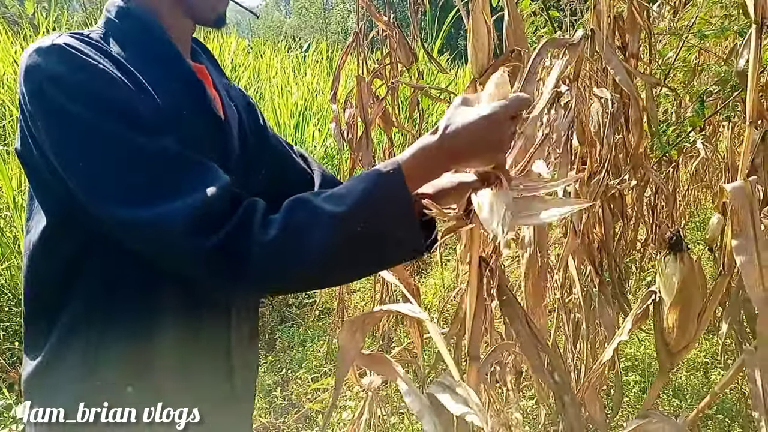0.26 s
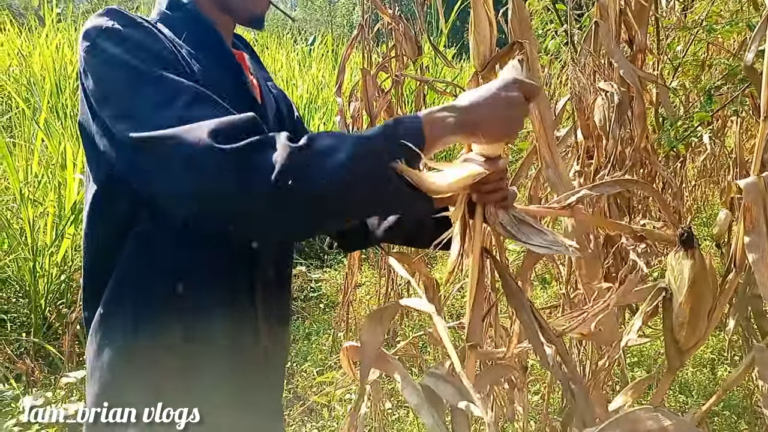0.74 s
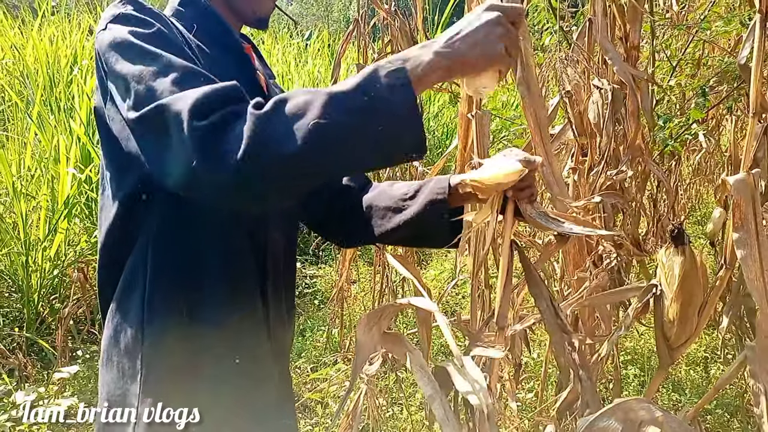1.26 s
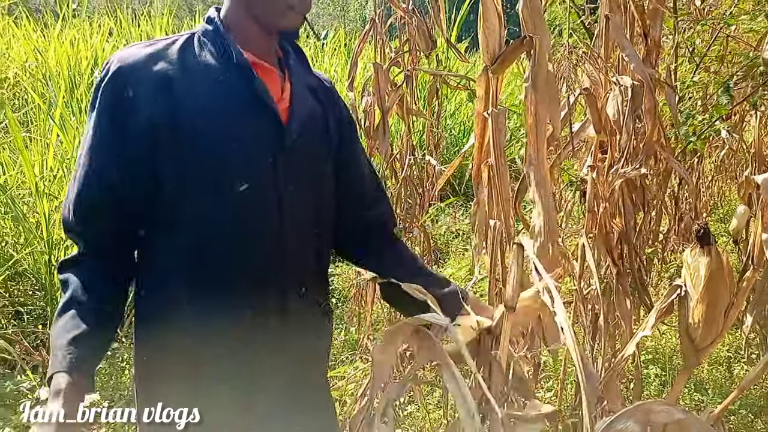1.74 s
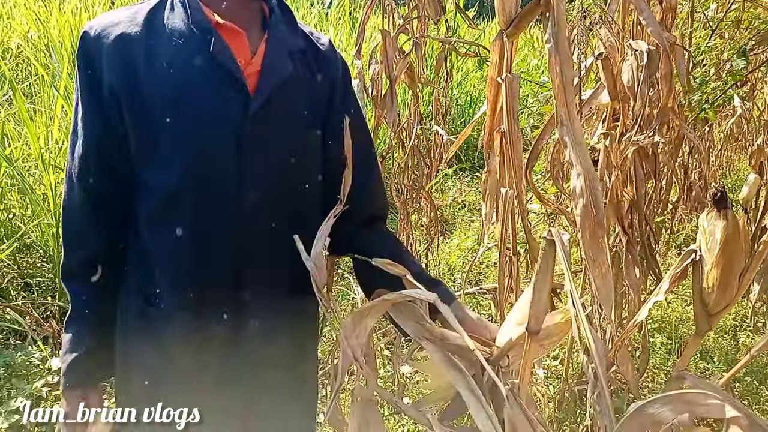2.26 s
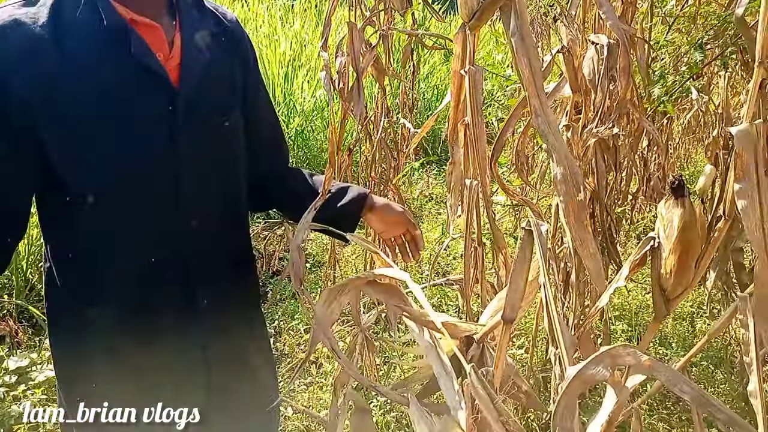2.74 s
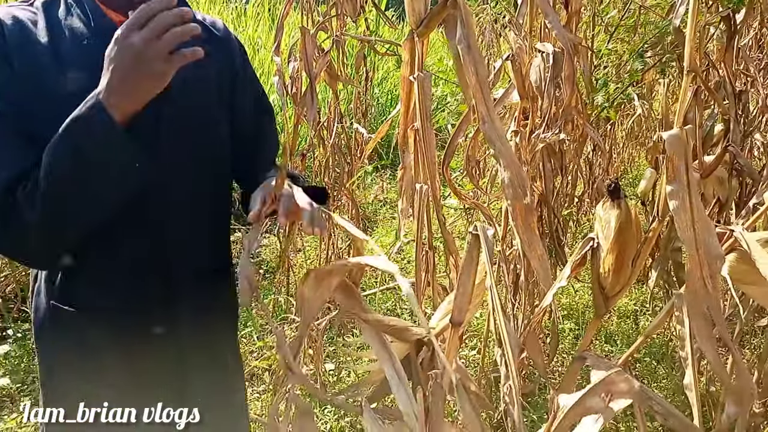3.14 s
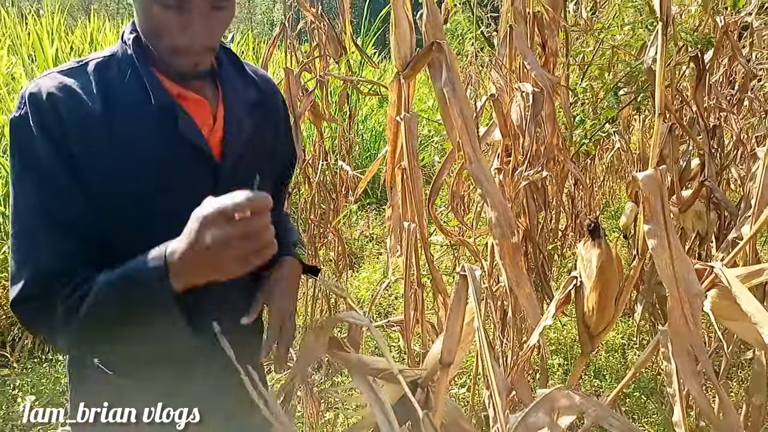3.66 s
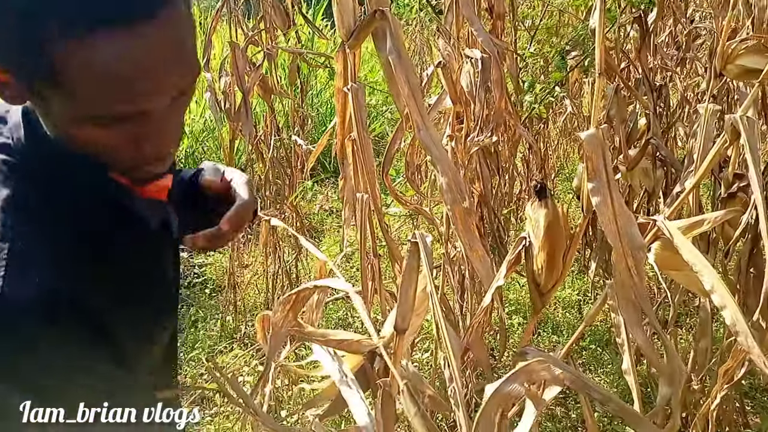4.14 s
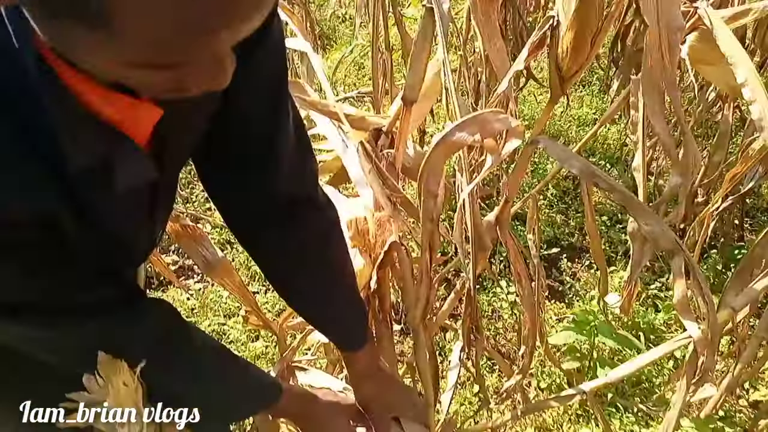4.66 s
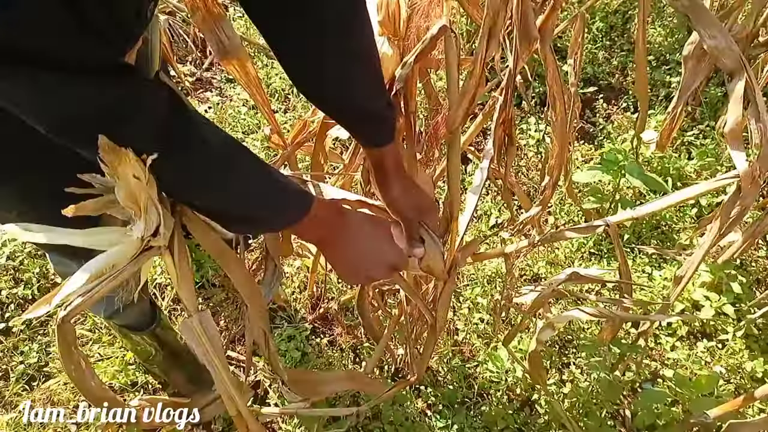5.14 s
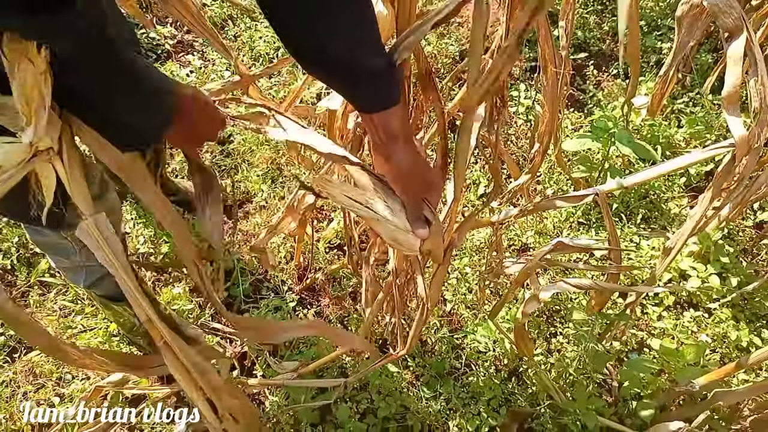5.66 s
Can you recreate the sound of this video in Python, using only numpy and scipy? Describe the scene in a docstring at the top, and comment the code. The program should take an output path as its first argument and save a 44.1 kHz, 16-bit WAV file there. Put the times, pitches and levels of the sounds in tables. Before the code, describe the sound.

Dry corn husks crinkle and tear close by, with sharp stalk snaps, small cloth bumps and a final burst of hard ripping.

```python
"""Dry maize husks crinkle in thousands of tiny cracks as an ear is husked and snapped off by hand.
Then another is stripped. Ribs and stalks snap more sharply: one crack, then a dying run of splinters.
A small microphone on the coat picks up bumps and scuffs of leaves and cloth, made of damped rings.
Deeper knocks come through the coat; short rubs, squeaks and faint low tones are narrow gliding noise.
The field is quiet: behind it all lies only a faint, steady noise of air."""
import sys
import numpy as np
from scipy import signal
from scipy.fft import rfft, irfft
from scipy.io import wavfile
from scipy.ndimage import uniform_filter1d

SR = 44100
rng = np.random.default_rng(int(sys.argv[2]) if len(sys.argv) > 2 else 0)


def output_pcm(signal):
    """Save a mono or channel-first signal as 16-bit PCM at the path in sys.argv[1].

    Samples are clipped to [-1, 1] before scaling.
    """
    pcm = np.clip(np.atleast_2d(signal).T, -1, 1) * 32767
    wavfile.write(sys.argv[1], SR, np.round(pcm).astype(np.int16))


N = 260190
TIME = np.arange(N) / SR  # s
EDGE_HZ = 15650  # top of the recorder's band

# colour of husks torn hard, as a relative spectrum: f/Hz, level per Hz/dB
TEAR_COLOUR = [(100, -28.5), (400, -31.5), (700, -11.5), (1200, -9), (1800, -4), (2200, 1.5), (2800, 5.5),
               (3900, 0), (5200, -1.5), (6600, 6), (8500, -3.5), (11000, -10), (13400, -17), (15200, 2)]


def amp(db):
    """Turns decibels into gain."""
    return 10 ** (np.asarray(db) / 20)


def unit(x):
    """Scales a sound to rms 1."""
    return x / np.sqrt(np.mean(x ** 2) + 1e-20)


def read(points, hz):
    """Reads a spectrum table along a log-frequency axis."""
    f, db = np.transpose(points)
    return np.interp(np.log(hz + 1), np.log(f), db)


def hump(hz, centre_hz, octaves):
    """A bell around one frequency, 1 at its top."""
    distance = np.log2((hz + 1) / centre_hz) / octaves
    return np.exp(-.5 * distance ** 2)


def add(mix, s, sound):
    """Mixes a sound in at a time in seconds."""
    part = mix[max(round(s * SR), 0):][:len(sound)]
    part += sound[:len(part)]


def causal(db):
    """The sharp-fronted impulse response that has this spectrum."""
    log_gain = np.log(amp(np.r_[db, db[-2:0:-1]]))
    # minimum phase puts the energy as early as it can be
    spectrum = np.exp(np.conj(signal.hilbert(log_gain)))
    return irfft(spectrum[:len(db)])


def stroke(t, start, length, rise_s, dying_s):
    """Gain of one movement: a quick rise, a hold, then it dies away."""
    rise = np.clip((t - start) / rise_s, 0, 1)
    return rise * np.exp(-np.maximum(t - start - length, 0) / dying_s)


def knock_ring(modes, pitch_hz, octaves, rise_s):
    """Damped modes after a soft contact that favours one pitch, scaled to peak 1."""
    t = np.arange(6000) / SR
    ring = np.zeros(len(t))
    for hz, db, t60 in modes:
        fading = amp(db - 60 * t / t60)
        ring += fading * hump(hz, pitch_hz, octaves) * np.sin(2 * np.pi * hz * t)
    ring *= (1 - np.exp(-t / rise_s)) ** 2  # the cloth gives way, so the ring swells in
    return ring / abs(ring).max()


def air(level_db=-76):
    """A faint, even outdoor background: noise shaped to the colour of still air."""
    # still air over the field, as a relative spectrum: f/Hz, level per Hz/dB
    air_colour = [(25, -46), (70, 3.5), (130, -6), (250, -1), (500, -3.5), (900, -11), (3000, -27.5),
                  (15000, -53)]
    gain = amp(read(air_colour, np.fft.rfftfreq(N, 1 / SR)))
    noise = irfft(rfft(rng.standard_normal(N)) * gain, N)
    return amp(level_db) * unit(noise)


def knocks():
    """Heavier, deeper blows that reach the microphone through the coat as damped rings."""
    # knocks as the ear breaks free and the picker bends down: t/s, peak/dB, pitch the blow favours/Hz
    blows = [(1.676, -36, 514), (4.601, -31.5, 324), (4.736, -29.5, 420), (4.753, -41, 90),
             (4.868, -40.5, 99)]
    # what they ring with: f/Hz, relative level/dB, time to fade by 60 dB/s
    thud_modes = [(75, -15, 0.25), (123, 9, 0.036), (170, -2.5, 0.072), (316.5, 5, 0.045),
                  (538, -6.5, 0.065), (712, 17, 0.015)]
    out = np.zeros(N)
    for s, db, pitch_hz in blows:
        ring = knock_ring(thud_modes, pitch_hz, octaves=1.36, rise_s=0.0022)
        add(out, s, amp(db) * ring)
    return out


def rubs():
    """Short resonant rubs, squeaks and faint soft low tones: noise in one narrow, gliding resonance."""
    # t/s, length/s, start f/Hz, end f/Hz, width of each of two equal resonators in a row/Hz, level/dB
    rubs_and_tones = [(0.313, 0.16, 260, 218, 61, -70.5), (0.819, .13, 1700, 1550, 20, -66.5),
                      (1.025, .09, 620, 560, 110, -68), (1.092, .11, 215, 220, 18, -70),
                      (1.288, 0.12, 95, 75, 49, -72.5), (1.387, 0.092, 560, 520, 330, -65),
                      (1.439, .16, 401, 380, 10, -67.5), (1.799, 0.22, 386, 410, 82, -67.5),
                      (1.936, .037, 1543, 1404, 180, -48), (3.765, .085, 1371, 1178, 360, -52)]
    out = np.zeros(N)
    for s, length, start_hz, end_hz, width_hz, db in rubs_and_tones:
        r = np.exp(-np.pi * width_hz / SR)
        noise = rng.standard_normal(SR) + 1j * rng.standard_normal(SR)
        wander = signal.lfilter([1], [1, -2 * r, r * r], noise)  # slow noise around 0 Hz
        hz = np.linspace(start_hz, end_hz, int(length * SR))
        glide = np.exp(2j * np.pi * np.cumsum(hz) / SR)
        tone = (wander[-len(hz):] * glide).real  # moves the noise up to the gliding pitch
        add(out, s, amp(db) * unit(tone * signal.windows.tukey(len(hz), .7)))
    return out


def brushing(scuff_db=-2, lowest_hz=125):
    """Single bumps, and scuffs made of many tiny slips, set the microphone and its mount ringing."""
    # cloth sliding over it: start t/s, length/s, level before scuff_db/dB, dying time/s, favoured pitch/Hz
    scuff_rows = [(2.127, 0.062, -33.5, 0.038, 434), (3.255, 0.028, -40.5, .035, 410),
                  (3.333, 0.15, -43, 0.057, 460), (4.75, 0.044, -58, .04, 520),
                  (5.239, 0.079, -51.5, 0.017, 486), (5.517, 0.1, -50.5, 0.042, 505)]
    # leaves and cloth bumping it: t/s, peak before the bass cut/dB, favoured pitch/Hz
    bump_rows = [(2.131, -26.5, 343), (2.141, -32.5, 1020), (2.172, -24.5, 215), (2.213, -28, 261),
                 (2.357, -42, 210), (3.264, -33.5, 513), (3.367, -36, 350), (3.4, -38.5, 1200),
                 (3.442, -32.5, 199), (3.458, -32.5, 200), (3.501, -37.5, 215), (3.548, -36.5, 170)]
    # what the microphone and mount ring with: f/Hz, relative level/dB, time to fade by 60 dB/s
    mount_modes = [(173, -2.5, 0.082), (204.7, 4.5, 0.067), (290, -9, 0.085), (362.5, -4.5, 0.047),
                   (529, 6.5, 0.016), (726, -9, 0.031), (1230, 11.5, 0.01)]
    slips = rng.standard_normal(N) * (rng.random(N) < 600 / SR)  # about 600 per second
    out = np.zeros(N)
    for start, length, db, dying_s, pitch_hz in scuff_rows:
        ring = knock_ring(mount_modes, pitch_hz, octaves=0.66, rise_s=0.002)
        scuff = unit(signal.oaconvolve(slips, ring)[:N])
        out += scuff * amp(db + scuff_db) * stroke(TIME, start, length, 0.015, dying_s)
    for s, db, pitch_hz in bump_rows:
        add(out, s, amp(db) * knock_ring(mount_modes, pitch_hz, octaves=0.51, rise_s=0.0026))
    # so light a contact moves no deep bass
    bass_cut = signal.butter(2, lowest_hz, "highpass", fs=SR, output="sos")
    return signal.sosfilt(bass_cut, out)


def handwork(t, stir_bright_db=4.5, stir_hollow_db=9.5):
    """Adds the power of pulls and stirring leaves; the strongest sets the colour.

    Returns level (dB), brightness (dB per octave) and hollow body (dB)."""
    # dry leaves stirring around the picker all the time: t/s, level/dB
    stirring = [(0, -51), (.25, -50.5), (.45, -47), (0.8, -49.5), (1.15, -51.5), (1.5, -50.5), (2.3, -51.5),
                (2.9, -51.5), (3.08, -55), (3.3, -49), (4.25, -49.5), (5.0, -48.5), (5.9, -49.5)]
    # grips and pulls on the husk: start t/s, length/s, level/dB, dying time/s,
    # brightness per octave/dB, hollow body/dB
    grips = [(0, 0.017, -39.5, 0.024, -1.5, -10), (0.322, 0.03, -51, 0.03, -15, -9),
             (0.406, 0.091, -48, 0.046, -2, 1), (0.553, 0.12, -45.5, 0.13, -3.5, -7),
             (1.03, 0.028, -40, 0.034, -3, -10), (1.575, 0.089, -38.5, 0.017, -3.5, -16),
             (1.681, 0.45, -36.5, 0.036, -4, -12.5), (1.738, 0.036, -34.5, 0.025, -2.5, -24),
             (1.829, 0.053, -35, 0.013, -5, -17), (2.134, 0.11, -45, .008, 2.5, 19),
             (3.146, 0.029, -47.5, 0.18, 3.5, 0), (3.355, 0.1, -45.5, 0.023, -5.5, -2),
             (3.529, 0.28, -49, 0.03, -5, -9.5), (4.335, 0.051, -45.5, 0.087, -3, -0.5),
             (4.476, 0.072, -51.5, 0.042, -4.5, -17), (4.533, .14, -47, 0.12, -3, 9),
             (4.749, 0.13, -38.5, 0.0084, -4.5, -5.5), (5.055, .04, -47.5, 0.032, 0.5, -2),
             (5.277, 0.048, -40, .008, 0, 7.5), (5.411, 0.03, -37, 0.021, -3, -11),
             (5.472, 0.022, -41, 0.03, -4.5, -31), (5.516, 0.087, -27, 0.066, -0.4, 1)]
    power = [amp(np.interp(t, *np.transpose(stirring))) ** 2]
    colours = [(stir_bright_db, stir_hollow_db)]
    for start, length, db, dying_s, bright_db, hollow_db in grips:
        # the fingers take 13 ms to load the husk
        pull = amp(db) * stroke(t, start, length, 0.013, dying_s)
        power.append(pull ** 2)
        colours.append((bright_db, hollow_db))
    total = np.sum(power, axis=0)
    bright_db, hollow_db = np.transpose(colours) @ np.array(power) / total  # average weighted by power
    return 10 * np.log10(total), bright_db, hollow_db


def small_snaps(count=70, level_db=-7, spread_db=5, low_hz=2800, high_hz=7900, lasts_s=0.0022):
    """Small ribs give way at random moments, louder when the hands work harder; rows as in snaps()."""
    when, size, ring = rng.random((count, 3)).T
    s = when * N / SR
    work_db = handwork(s)[0]
    db = work_db + level_db + spread_db * (2 * size - 1)
    ring_hz = low_hz * (high_hz / low_hz) ** ring
    return [(*row, lasts_s, 0) for row in zip(s, db, ring_hz)]


def snaps(focus_db=15, splinters_per_s=6000, shiver_s=0.025, level_db=1, ring_db=-12, ring_s=0.0017):
    """A first crack and a dying run of splinters ring the broken piece; the leaf around it shivers."""
    # breaking ribs and stalks: t/s, level of the loudest 4 ms before level_db/dB, ring of the piece/Hz,
    # dying time of the splintering/s, sharp edge/dB
    breaks = [(0.101, -45, 4830, 0.0067, 5), (0.238, -33.5, 4600, 0.0029, 12.5),
              (0.499, -37.5, 2800, 0.013, -12), (0.791, -41.5, 5830, 0.009, 5),
              (1.0376, -39, 2800, 0.0077, 20), (1.28, -47, 6300, 0.0047, 13),
              (1.6234, -24.5, 2080, 0.00088, 15.5), (1.632, -25, 2000, 0.01, 5),
              (1.676, -23.5, 1830, 0.0041, 13), (1.679, -22, 5500, 0.0066, 13),
              (1.785, -33, 5050, .0035, 0), (1.882, -35.5, 3000, .008, 2), (2.094, -33, 5660, 0.015, 16),
              (2.934, -40.5, 6800, .0082, 3), (2.995, -26.5, 6900, 0.0056, 13.5),
              (3.397, -28.5, 7100, 0.011, 21), (3.546, -46.5, 3840, 0.0084, 0),
              (3.616, -40, 3500, 0.003, 0), (3.774, -38, 1570, 0.0058, -4), (3.82, -50, 1160, .0018, 0),
              (4.389, -51, 2350, .013, 2), (4.565, -35, 6060, 0.013, -13),
              (4.781, -31.5, 7000, 0.0021, -19), (4.799, -26.5, 2850, 0.0038, -22),
              (4.868, -34.5, 4600, 0.011, -2), (4.937, -49, 6600, 0.0015, -5),
              (4.964, -36.5, 6300, 0.0015, -7), (5.047, -45, 7060, 0.0014, -6),
              (5.146, -46.5, 7200, .002, 3), (5.183, -45.5, 8900, .001, -7),
              (5.299, -38.5, 5630, 0.013, 10), (5.405, -32, 8400, 0.0064, 4), (5.409, -35, 4570, .0035, -2),
              (5.498, -24.5, 2980, 0.0012, -4), (5.544, -25, 3000, 0.0036, 11),
              (5.601, -30.5, 2950, 0.01, 9), (5.689, -35.5, 3100, 0.0018, -4)]
    t, hz, out = np.arange(4096) / SR, np.fft.rfftfreq(2048, 1 / SR), np.zeros(N)
    for s, db, ring_hz, lasts, edge_db in [*breaks, *small_snaps()]:
        size, shiver, piece = rng.standard_normal((3, len(t)))
        splinters = rng.random(len(t)) < splinters_per_s / SR
        cracks = .35 * size * splinters * np.exp(-t / lasts)
        cracks[0] = 1  # the first crack
        cracks += amp(-35) / 2 * np.linalg.norm(cracks) * shiver * np.exp(-t / shiver_s)
        ring = np.r_[1, amp(ring_db) * (piece * np.exp(-t / ring_s))[1:256]]
        colour_db = read(TEAR_COLOUR, hz) + focus_db * hump(hz, ring_hz, octaves=0.47)
        colour_db += edge_db * hump(hz, 13650, octaves=0.35)  # the sharp edge of a clean break
        snap = signal.fftconvolve(signal.fftconvolve(cracks, ring), causal(colour_db))
        loudest = np.sqrt(uniform_filter1d(snap ** 2, size=176, mode="constant").max())
        add(out, s, amp(db + level_db) * snap / loudest)
    return out


def fractures(per_s, spread_db, ring_s, count=48):
    """Tiny cracks of very uneven size, each ringing the three modes of one of many patches of leaf."""
    t, out = np.arange(512) / SR, np.zeros(N)
    size = amp(spread_db * np.minimum(rng.exponential(1, N), 4))
    size *= rng.random(N) < per_s / SR  # keeps only the samples where a crack happens
    patch = rng.integers(0, count, N)
    pitches = rng.permutation(np.linspace(100, EDGE_HZ, 3 * count)).reshape(count, 3)
    for k, modes_hz in enumerate(pitches):
        ring = np.cos(2 * np.pi * modes_hz[:, None] * t).sum(axis=0) * np.exp(-t / ring_s)
        out += signal.oaconvolve(size * (patch == k), ring)[:N]
    return unit(out)


def husks(hiss_db=-6, flutter_db=1.1, patchy_db=4.0, light_db=-50, hard_db=-32,
          clumps_per_s=60, clump_s=0.039):
    """Fractures over the hiss of sliding leaves; harder work turns the crinkle into a tear."""
    # colour of husks lightly crinkled, as a relative spectrum: f/Hz, level per Hz/dB
    crinkle_colour = [(100, -24), (400, -20.5), (700, -20), (1200, -17.5), (1800, -9), (2200, -0.5),
                      (2650, 5), (3900, -8), (5200, -6.5), (6600, 0.5), (8500, -8.5), (11000, -22.5),
                      (13400, -29), (15200, -9.5)]
    grains = fractures(per_s=6500, spread_db=3.6, ring_s=.0008)
    rustle = unit(grains + amp(hiss_db) * rng.standard_normal(N))
    hz, t, z = signal.stft(rustle, SR, nperseg=1024, noverlap=768)
    work_db, bright_db, body_db = handwork(t)
    hz = hz[:, None]
    force = np.clip((work_db - light_db) / (hard_db - light_db), 0, 1)  # 0 crinkles, 1 tears
    db = (1 - force) * read(crinkle_colour, hz) + force * read(TEAR_COLOUR, hz)
    db += bright_db * np.log2(np.clip(hz, 2000, 11000) / 4500)
    db += body_db * hump(hz, centre_hz=1020, octaves=0.77)
    # the narrow resonances of the leaves come and go as they bend
    patches = uniform_filter1d(rng.standard_normal(z.shape), size=3, axis=0)
    patches = uniform_filter1d(patches, size=18, axis=1)
    colour = amp(db + patchy_db * unit(patches))
    colour /= np.sqrt(np.mean(colour ** 2, axis=0))  # colour alone, no change of level
    sound = signal.istft(z * colour, SR, nperseg=1024, noverlap=768)[1][:N]
    # a leaf lets go suddenly, so the cracks come in clumps that start sharply and die away
    releases = rng.random(N) * (rng.random(N) < clumps_per_s / SR)
    clumps = signal.lfilter([1], [1, -np.exp(-1 / (clump_s * SR))], releases)
    flutter = flutter_db * unit(clumps - clumps.mean())
    return sound * amp(np.interp(TIME, t, work_db) + flutter)


def scene():
    """Everything is close and dry in the open field: the layers are added without echo."""
    return (husks() + snaps() + rubs() + brushing() + knocks() + air())[None]


def record(dry):
    """The recorder's band limit: a steep filter that lets through only what lies below EDGE_HZ."""
    low_pass = signal.firwin(511, EDGE_HZ, window=("kaiser", 8), fs=SR)
    return signal.oaconvolve(dry, low_pass[None], "same")


dry = scene()
out = record(dry)
output_pcm(out)
```